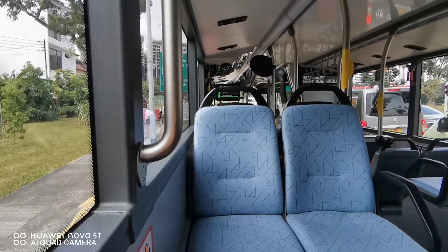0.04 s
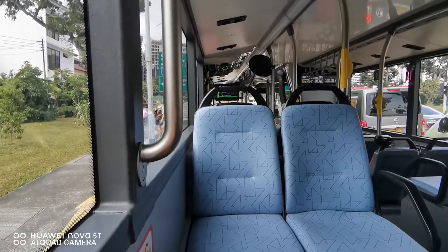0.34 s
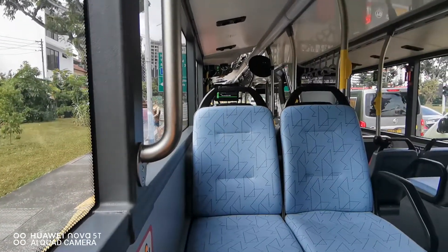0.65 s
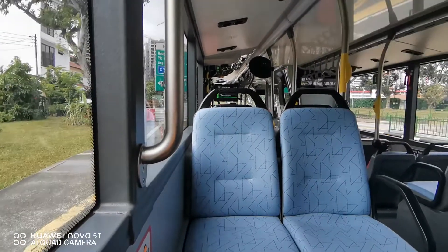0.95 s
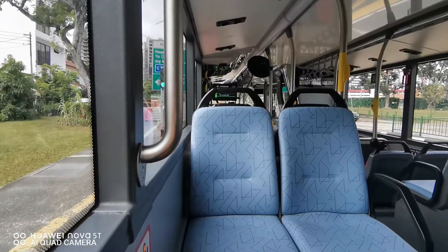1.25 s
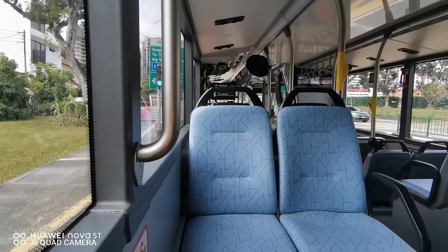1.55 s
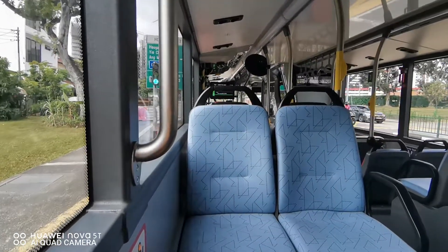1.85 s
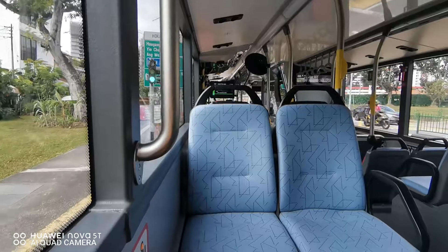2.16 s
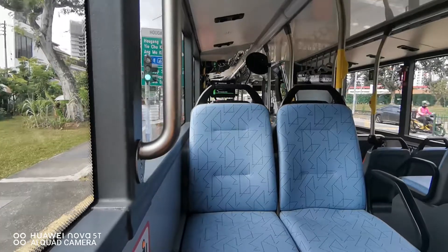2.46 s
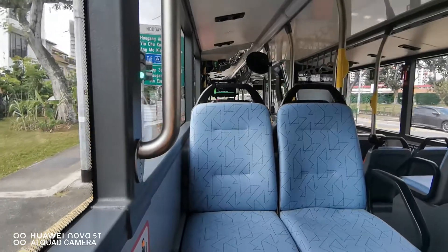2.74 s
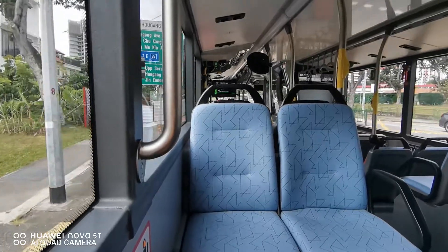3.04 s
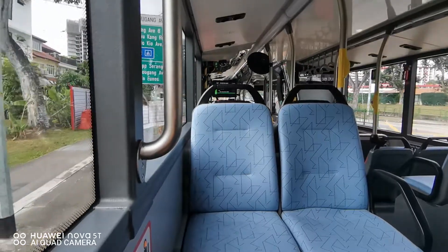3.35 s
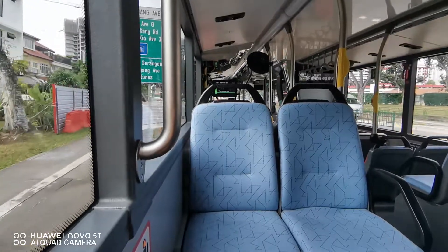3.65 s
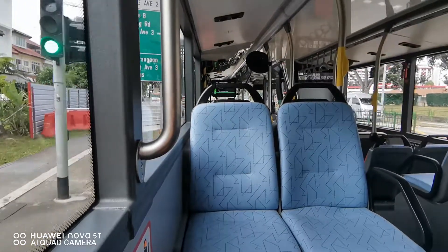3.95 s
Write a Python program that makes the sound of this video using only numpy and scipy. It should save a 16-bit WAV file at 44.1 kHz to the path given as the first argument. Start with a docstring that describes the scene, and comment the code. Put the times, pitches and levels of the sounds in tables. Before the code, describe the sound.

Bus engine heard from inside, easing off with a sharp hiss of air, then climbing again.

```python
"""A diesel engine, heard from inside a city bus that pulls through a junction. It eases off for a gear
change, then climbs again, and its tones boom in turn as they pass the cabin's resonances (the pitches
the cabin boosts). As it eases off, a thin friction squeal stops and a valve lets out a short, sharp
hiss of air. Behind it all are road rumble, ventilation and faint rattles of loose trim."""
import sys
import numpy as np
from scipy import signal
from scipy.fft import rfft, irfft
from scipy.io import wavfile

SR = 44100
rng = np.random.default_rng(int(sys.argv[2]) if len(sys.argv) > 2 else 0)


def persist_wave(psi):
    """Save psi, clipped to +-1, as 16-bit WAV."""
    counts = np.round(np.clip(psi, -1, 1) * 32767).astype(np.int16)
    wavfile.write(sys.argv[1], SR, np.atleast_2d(counts).T)


N = 176400
T = np.arange(N) / SR
HZ = np.fft.rfftfreq(N, 1 / SR)

# Engine speed. Each row: time in seconds, firings per second.
ENGINE_SPEED = [(0, 59.5), (.3, 58.8), (.55, 57.5), (.8, 47), (1.5, 54.3), (1.9, 59.6), (2.4, 64.4),
                (2.7, 66.8), (3, 70.4), (3.5, 77), (4, 84.1)]
# How hard the engine works. Each row: time in seconds, load in dB.
ENGINE_LOAD = [(0, -13), (.2, -11), (.48, -6), (.58, -25), (.7, -26), (.79, -0.5), (1.2, -4), (1.5, -0.8),
               (2.2, -3.5), (2.7, -1), (3.2, -1.6), (3.6, -1), (4, -0.5)]
# Engine tones. Each row: multiple of the cycle rate, base level in dB,
# dB lost per Hz of firing rate below CRUISE_HZ, dB gained per dB of load.
ENGINE_TONES = [(5, -38, 0, 1), (6, -24, 0, 1), (7, -31.5, .4, 1), (8, -27, .65, 1), (9, -22, .45, 1.6),
                (10, -29, .05, 1.6), (11, -35, .2, 1), (12, -23.5, 0, 2), (13, -41, 0, 1), (14, -38, 0, 1),
                (15, -38, 0, 1), (16, -39, 0, .3), (18, -34.5, 0, .3), (24, -38, 0, 1), (30, -38, 0, 1),
                (36, -37, 0, 1)]
# Cabin resonances. Each row: pitch in Hz, width in Hz, gain in dB.
CABIN_RESONANCES = [(49, 6, -8.5), (61.4, 6, 1.8), (76, 7.5, -1.3), (89, 9, -8), (99, 7, -7),
                    (110.5, 12, 0), (121, 7, -5.5), (135.5, 12, 1.7), (145.5, 8, -2), (154, 8, 2),
                    (164.5, 15, 8.4), (178, 18, -2), (202, 20, -5), (235, 30, -4), (380, 260, -9)]
# Tone colours of the noises. Each row: frequency in Hz, relative strength in dB.
CLATTER_COLOUR = [(150, -33), (420, 1.5), (800, 2.5), (1200, -5), (1700, -4), (2800, -9.5), (5000, -15.5),
                  (12000, -44)]
HISS_COLOUR = [(1500, -30), (2000, -9), (2400, -15), (3200, 2.5), (3700, -6), (4800, 2.5), (5600, -7),
               (6500, -2), (7600, -4), (8200, -2), (8850, 4.5), (9500, 0), (10000, -1.5), (11000, -3.5),
               (12600, -7.5), (14000, -13), (15500, -19)]
ROAD_COLOUR = [(12, -28), (29, -0.5), (40, -7), (58, 1), (72, -8), (88, 1.5), (108, -1), (125, -7),
               (148, 2), (162, -0.5), (178, 3), (210, -1.5), (235, -3), (325, -6.5), (450, -8), (550, -14),
               (720, -16.5), (1100, -25), (2500, -44), (8000, -59.5)]
AIR_COLOUR = [(530, -11), (900, -1), (1070, 0), (1150, -2), (1440, -1.5), (1740, -1), (1910, -4.5),
              (2390, -5.5), (2790, -4), (3500, -5.5), (4200, -8.5), (4780, -9), (5650, -18.5), (6700, -19),
              (8130, -26), (9000, -23.5), (9450, -20.5), (10000, -29), (11300, -28), (15000, -53)]
RATTLE_COLOUR = [(400, -12), (1500, 9), (4500, 5), (7000, -11), (10000, -20), (15000, -28)]
# How the noises rise and fall. Each row: time in seconds, gain in dB.
CLATTER_GAIN = [(0, -34), (.2, -34), (.53, -32.5), (.6, -42), (.7, -37), (.8, -36.5), (1.3, -39.5),
                (2.8, -39.5), (4, -41)]
ROAD_GAIN = [(0, -24.5), (.52, -25.5), (.59, -31), (.69, -29.5), (.79, -24), (1.6, -25.5), (2.3, -24),
             (3.3, -24.5), (4, -25.5)]
DEEP_RUMBLE_GAIN = [(0, -1), (.7, 0), (1.05, -3), (1.6, -3), (2.2, -2.5), (3, -8), (3.45, -3.5), (4, 4)]
PANEL_GAIN = [(0, 0.5), (.5, -1.5), (.65, -6.5), (1, -1), (1.9, -1), (2.3, 3.5), (2.95, 4), (3.4, 1.5),
              (4, -2)]
AIR_GAIN = [(.5, -39.5), (.66, -41.5), (0.85, -39.5), (1.21, -40), (3.18, -40.5), (3.43, -43),
            (3.66, -41.5), (3.91, -43.5), (3.95, -40.5)]
# The squeal's strength. Each row: time in seconds, left gain in dB, right gain in dB.
SQUEAL_GAINS = [(0, -42, -51), (.05, -45, -44), (.09, -44, -33.5), (.14, -50, -31.5), (.167, -41, -48),
                (.2, -38, -33.5), (.245, -41, -27.5), (.3, -31, -24.5), (.335, -38, -32), (.365, -36, -49),
                (.395, -33, -36), (.425, -46, -26.5), (.467, -43, -36), (.488, -46, -26), (.515, -44, -43),
                (.533, -41, -41), (.57, -54, -54)]
# Ringing panels. Each row: pitch in Hz, width in Hz, base level in dB.
PANEL_RINGS = [(154.6, 5.7, -38), (233.3, 21.7, -36.5), (288.7, 3.4, -42), (457, 39, -47), (617, 21, -50),
               (701, 16, -52.5), (1437, 23, -56.5), (1692, 13, -57.5)]
# Clear ticks of the trim. Each row: start in seconds, level in dB.
TRIM_TICKS = [(.805, -38), (.826, -42), (1.02, -36)]
# Balance of the hiss and of all other noise. Each row: frequency in Hz, left minus right in dB.
HISS_BALANCE = [(2000, -2), (4400, -7), (6000, 2), (7000, -1), (8200, 20), (9000, 14), (10000, 6),
                (11000, -5), (13000, 3), (14200, 6), (15000, 25)]
CABIN_BALANCE = [(60, 0), (87, 3), (130, 2), (180, -1.2), (260, 2.3), (380, 1.5), (550, -2), (790, -0.5),
                 (1140, -1.5), (1650, 0.1), (2380, -2.0), (3440, -7), (4970, -4.5), (7180, 5), (10400, 8.5),
                 (15000, -2)]
# How alike the two sides are. Each row: frequency in Hz, likeness from 0 to 1.
SIDE_LIKENESS = [(30, .88), (60, .96), (150, .985), (290, .91), (400, .76), (550, .62), (720, .8),
                 (1100, .15), (1400, .48), (1650, .15), (1900, .42), (2400, .1), (3400, .22), (6000, .1)]
# How far the left side runs ahead. Each row: frequency in Hz, lead in radians.
LEFT_LEAD = [(100, -.05), (400, .05), (750, .2), (1450, 1.2), (1890, 3.6), (3450, 6)]

CYLINDERS, CRUISE_HZ = 6, 75


def engine(firing_hz):
    """The firing cylinders make a stack of tones; each swells as it passes a cabin resonance."""
    waver_db, left_louder_db = .5, 1.4
    cabin = np.sqrt(sum((amp(db) * resonance(hz, width)) ** 2 for hz, width, db in CABIN_RESONANCES))
    cycle_hz = firing_hz / CYLINDERS  # each cylinder fires once per cycle
    cycles = np.cumsum(cycle_hz) / SR
    load_db = curve(ENGINE_LOAD)
    slowdown_hz = np.maximum(CRUISE_HZ - firing_hz, 0)
    tones = np.zeros(N)
    for multiple, db, loss, pull in ENGINE_TONES:
        level = amp(db + pull * load_db - loss * slowdown_hz + waver_db * drift(23))
        boom = np.interp(multiple * cycle_hz, HZ, cabin)
        tones += level * boom * np.sin(2 * np.pi * (multiple * cycles + rng.random()))
    return np.sqrt(2) * tones * sides(left_louder_db)[:, None]


def clatter(firing_hz):
    """Each firing of the diesel gives a puff of noise, uneven in strength."""
    since_firing = np.cumsum(firing_hz) / SR % 1  # runs from 0 to 1 between firings
    puffs = 2.1 + np.exp(-since_firing / .8)
    uneven_db = 1.75 * drift(27)
    return noise(spectrum(CLATTER_COLOUR), pulses=puffs) * amp(curve(CLATTER_GAIN) + uneven_db)


def turbo(firing_hz):
    """The turbo adds a very faint, fuzzy whine that climbs with the engine."""
    hz = 144 * firing_hz * (1 + .018 * drift(150))
    level_db = -72 + .3 * (firing_hz - CRUISE_HZ)
    return amp(level_db) * np.sin(2 * np.pi * np.cumsum(hz) / SR)


def squeal():
    """Friction makes one slowly rising tone that swims between the sides and rings out briefly."""
    start_hz, rise_hz_per_s, boost_db, fall_db_per_s = 4121, 68, 2.5, 60
    hz = (start_hz + rise_hz_per_s * T) * (1 + .0011 * drift(60))
    gains_db = np.array([curve(SQUEAL_GAINS), curve(SQUEAL_GAINS, column=2)])
    fade_db = fall_db_per_s * np.maximum(T - SQUEAL_GAINS[-1][0], 0)
    phase = 2 * np.pi * np.cumsum(hz) / SR + np.array([[0], [np.pi / 2]])  # right side leads
    return np.sqrt(2) * amp(boost_db + gains_db - fade_db) * np.sin(phase)


def air_release():
    """A valve snaps open; the bright jet fills out, then dies with the pressure, lows and top first."""
    start_s, rise_s, fill_s = .5416, .002, .015
    level_db, fall_db_per_s = -30.5, 84
    age = T - start_s
    unfilled = np.clip(1 - age / fill_s, 0, 1)
    fading_s = np.maximum(age - fill_s, 0)
    jet = noise(spectrum(HISS_COLOUR), HISS_BALANCE)
    low = below(jet, hz=5470)
    top = jet - below(jet, hz=12500)
    middle = jet - low - top
    hiss = low * amp(-13 * unfilled - 67 * fading_s)
    hiss += middle * amp(-8 * unfilled)
    hiss += top * amp(-25 * fading_s)
    return hiss * np.clip(age / rise_s, 0, 1) * amp(level_db - fall_db_per_s * fading_s)


def valve_outlet():
    """At full flow the jet briefly rings the valve's outlet, giving the hiss a hollow body."""
    start_s, rise_s, level_db, fall_db_per_s = .556, .005, -33.3, 130
    age = np.maximum(T - start_s, 0)
    ring = ringing_noise(hz=2460, width=770)
    return ring * np.minimum(age / rise_s, 1) * amp(level_db - fall_db_per_s * age)


def road():
    """The road rumbles through the floor, and a few panels ring along."""
    bumps_db = .73 * drift(22)
    rumble = noise(spectrum(ROAD_COLOUR)) * amp(curve(ROAD_GAIN) + bumps_db)
    deep = below(rumble, hz=80)
    panels = sum(amp(db) * ringing_noise(hz, width) for hz, width, db in PANEL_RINGS)
    return rumble - deep + deep * amp(curve(DEEP_RUMBLE_GAIN)) + panels * amp(curve(PANEL_GAIN))


def ventilation():
    """Air from the vents and noise from the tyres blend into a smooth rush."""
    boost_db, low_cut_hz = 3, 815
    low_cut_db = 20 * np.log10(1e-6 + HZ ** 2 / (HZ ** 2 + low_cut_hz ** 2))
    rush = noise(spectrum(AIR_COLOUR) + low_cut_db)
    flutter_db = .37 * drift(8.1)
    return rush * amp(boost_db + curve(AIR_GAIN) + flutter_db)


def rattles():
    """Loose trim makes short, dry ticks: a few clear ones, and a faint random patter all along."""
    tick_decay_s, patter_decay_s, patter_per_s = .019, .006, 22
    ticks = sum(amp(db) * (T > start) * np.exp(-abs(T - start) / tick_decay_s)
                for start, db in TRIM_TICKS)
    kicks = (rng.random(N) < patter_per_s / SR) * rng.uniform(.43, 1, N)
    # Give each kick a quickly fading tail.
    patter = amp(-39) * signal.lfilter([1], [1, -np.exp(-1 / (patter_decay_s * SR))], kicks)
    return noise(spectrum(RATTLE_COLOUR)) * (ticks + patter)


def noise(colour_db, balance=CABIN_BALANCE, pulses=1):
    """Stereo noise of a set strength; its two sides are alike in the bass and differ in the treble."""
    left, separate = rfft(rng.standard_normal((2, N)) * pulses)
    likeness = spectrum(SIDE_LIKENESS)
    shared = likeness * left * np.exp(-1j * spectrum(LEFT_LEAD))
    right = shared + np.sqrt(1 - likeness ** 2) * separate
    pair = irfft(np.array([left, right]) * amp(colour_db) * sides(spectrum(balance)), N)
    return pair / pair.mean(0).std()


def ringing_noise(hz, width):
    """Noise gathered around one pitch."""
    return noise(20 * np.log10(resonance(hz, width)))


def resonance(hz, width):
    """A gain of 1 at one pitch that drops steeply on both sides."""
    return 1 / np.sqrt(1 + (2 * (HZ - hz) / width) ** 6)


def below(sound, hz):
    """Keeps the part of a sound below a frequency, with a soft edge."""
    return irfft(rfft(sound) / (1 + (HZ / hz) ** 8), N)


def drift(rate_hz):
    """A smooth random wobble with a typical size of 1."""
    return unit(irfft(rfft(rng.standard_normal(N)) / (1 + (HZ / rate_hz) ** 4), N))


def unit(x):
    """Scales a signal to an average power of 1."""
    return x / np.sqrt(np.mean(x ** 2) + 1e-20)


def sides(left_louder_db):
    """Left and right gains with an average power of 1."""
    pair = amp(np.array([left_louder_db, -left_louder_db]) / 2)
    return pair / np.sqrt((pair ** 2).mean(0))


def curve(rows, column=1):
    """Joins the points of a time table, giving a value for every sample."""
    rows = np.array(rows)
    return np.interp(T, rows[:, 0], rows[:, column])


def spectrum(rows):
    """Joins the points of a frequency table, giving a value for every frequency."""
    hz, value = np.transpose(rows)
    return np.interp(np.log(HZ + 1), np.log(hz + 1), value)


def amp(db):
    """Turns decibels into a gain."""
    return 10 ** (np.asarray(db) / 20)


def scene():
    """Everything together, as heard from a seat."""
    firing_hz = curve(ENGINE_SPEED) * (1 + .0012 * drift(4.2))
    diesel = engine(firing_hz) + clatter(firing_hz) + turbo(firing_hz)
    return diesel + road() + ventilation() + squeal() + air_release() + valve_outlet() + rattles()


def record(dry):
    """Cuts away the very highest treble."""
    top_hz = 15750
    low_pass = signal.firwin(511, top_hz, window=("kaiser", 9), fs=SR)
    return signal.oaconvolve(dry, low_pass[None], "same")


dry = scene()
out = record(dry)
persist_wave(out)
```